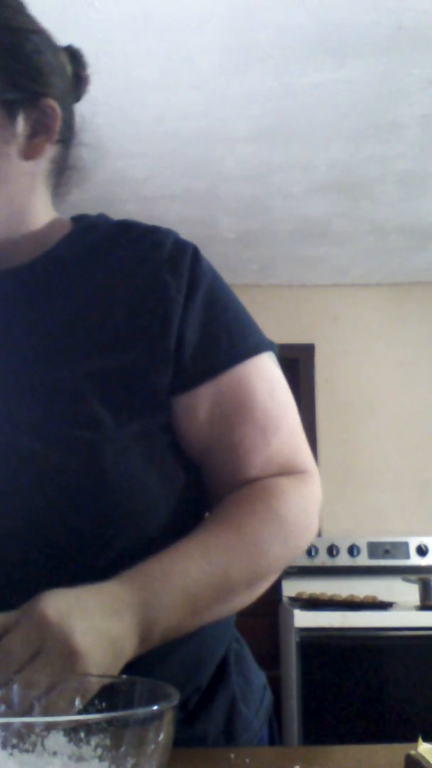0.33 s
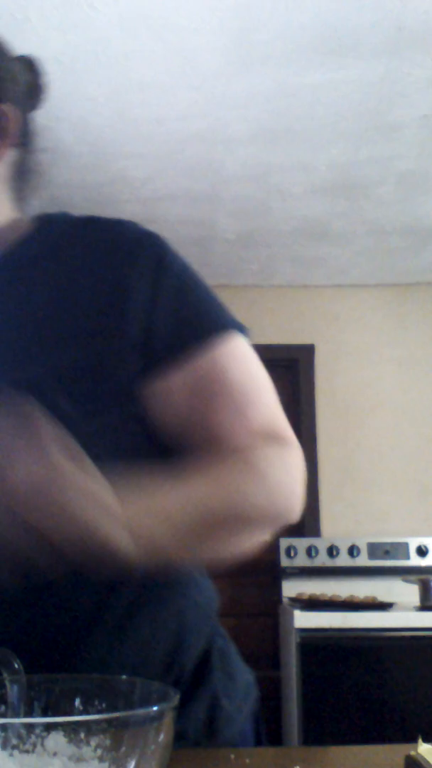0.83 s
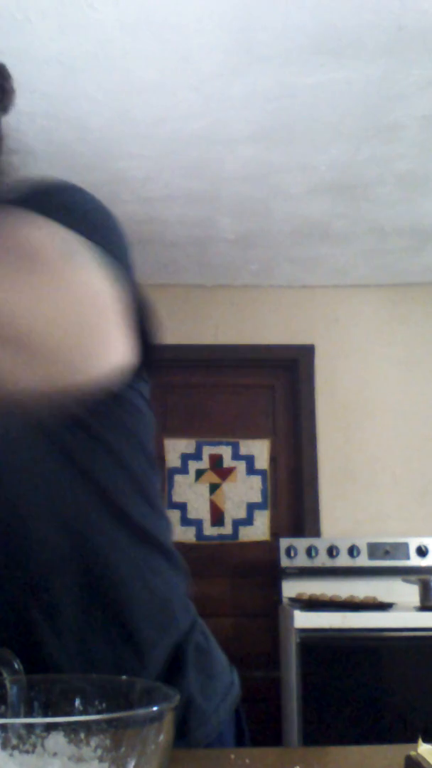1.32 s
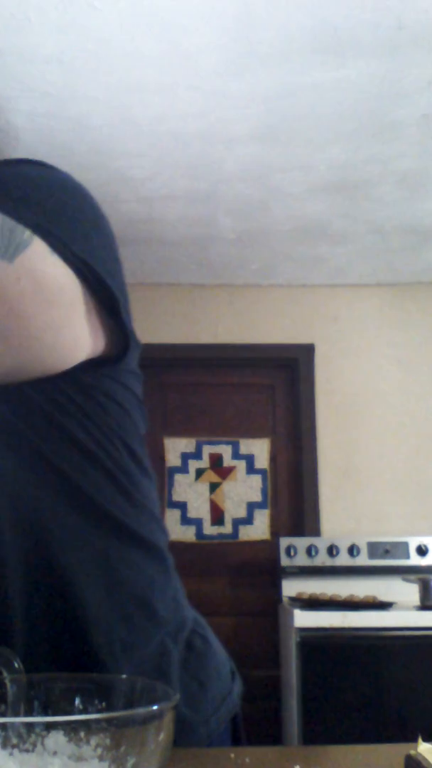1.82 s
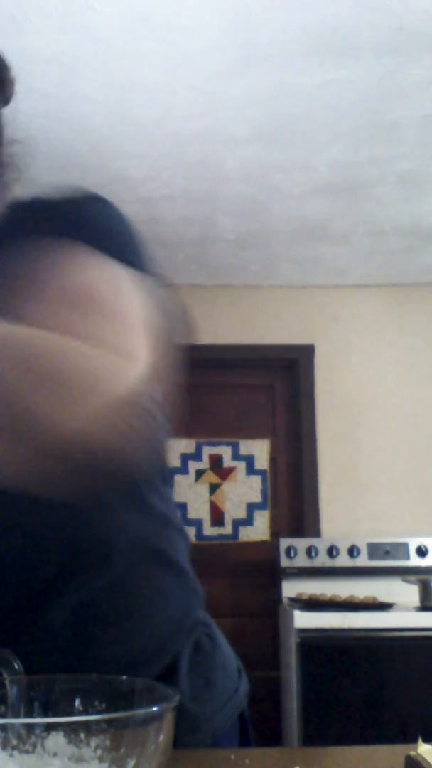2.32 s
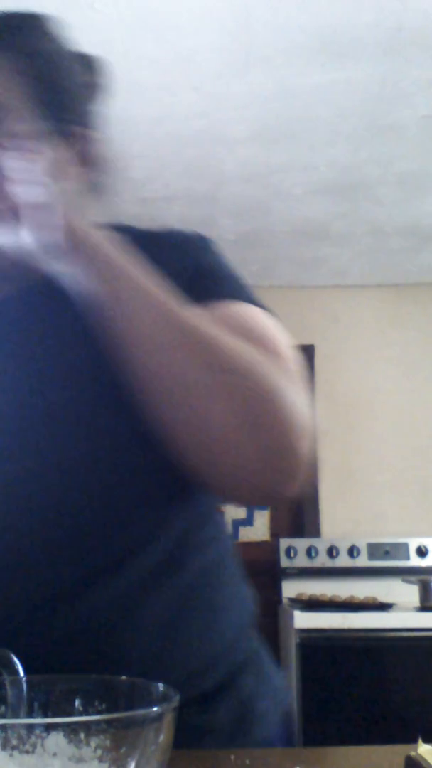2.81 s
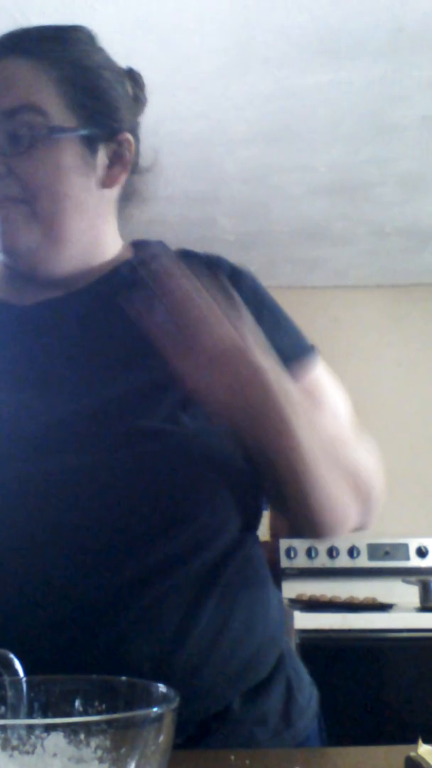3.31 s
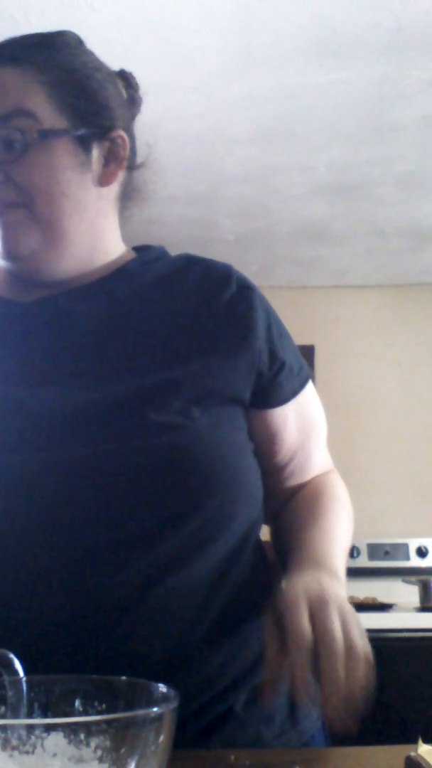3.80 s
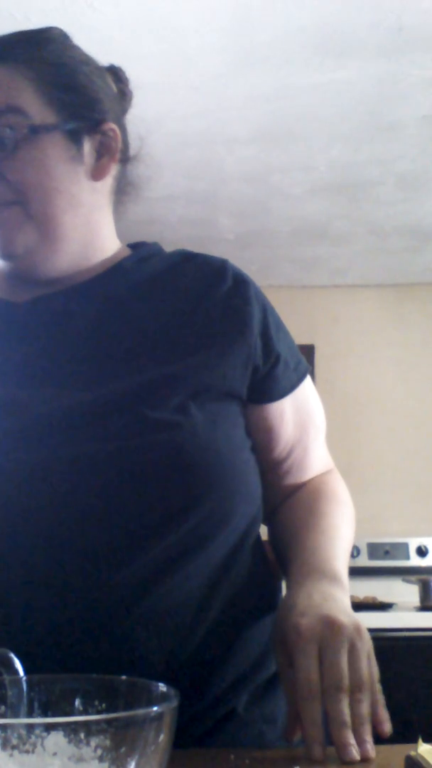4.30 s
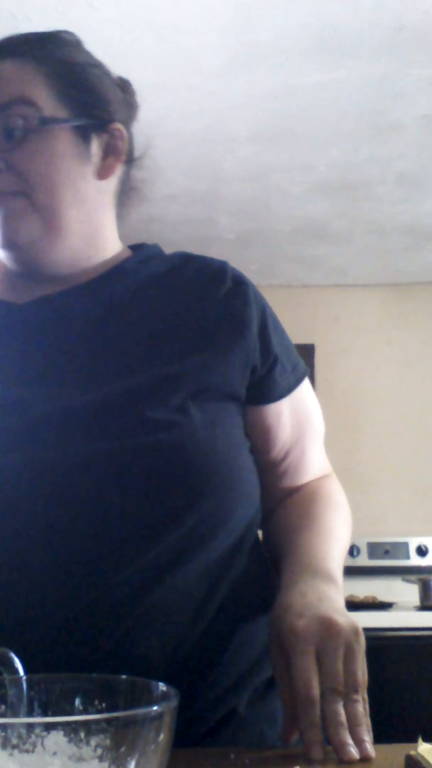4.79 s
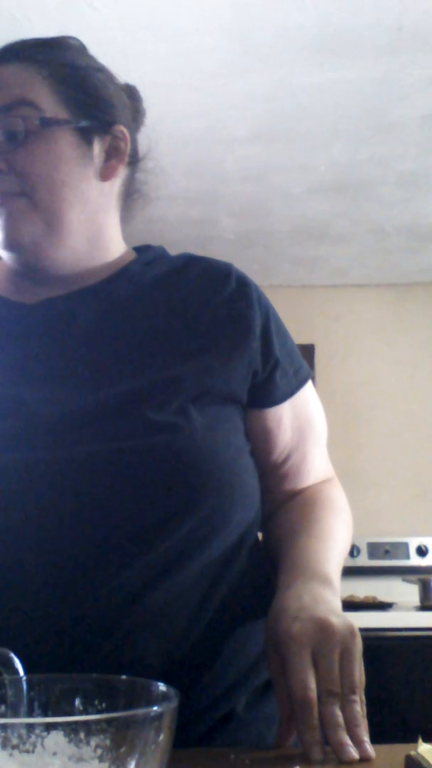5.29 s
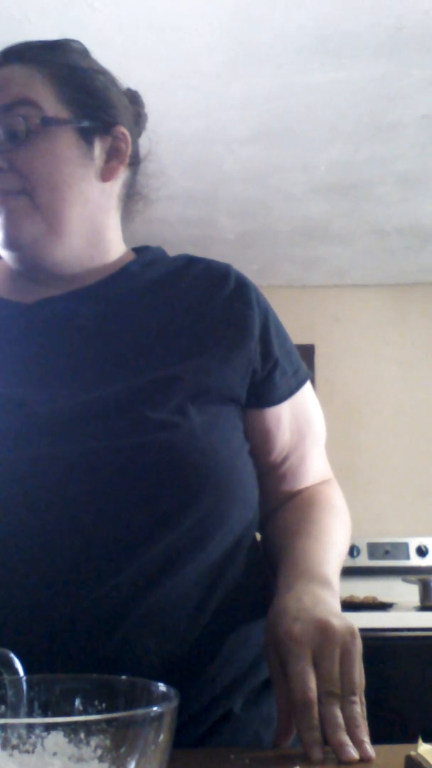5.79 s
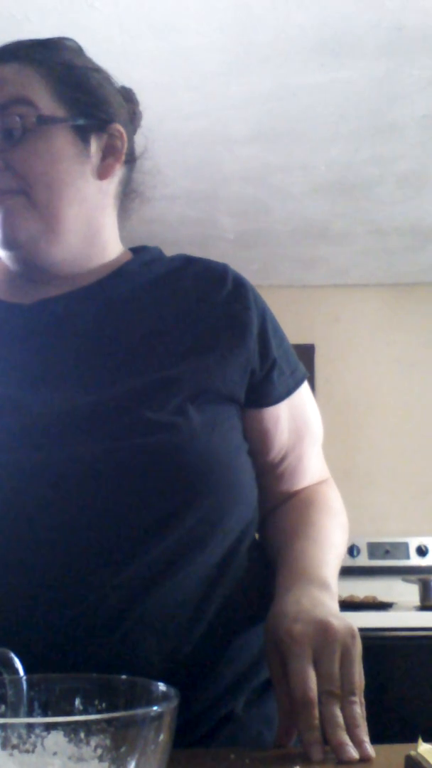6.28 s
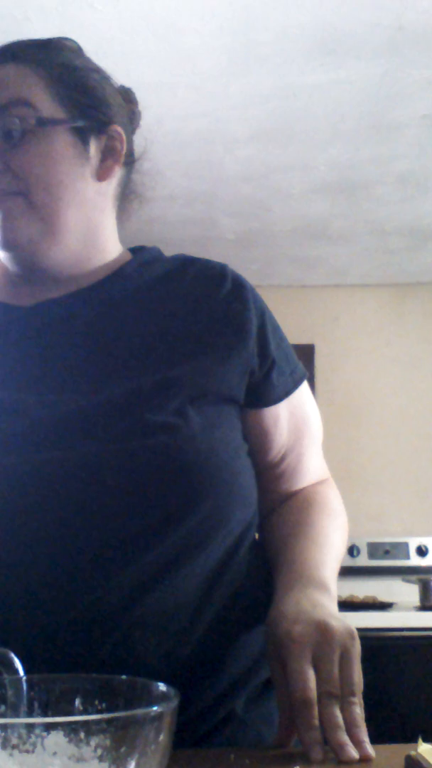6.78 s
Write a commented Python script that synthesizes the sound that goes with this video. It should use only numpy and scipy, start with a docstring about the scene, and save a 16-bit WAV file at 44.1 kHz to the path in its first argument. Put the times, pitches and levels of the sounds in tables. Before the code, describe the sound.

Thuds on a kitchen counter, faint taps and a glass clink, then a blender roars in two rattling pulses, grinding nuts.

```python
"""A kitchen blender runs in two pulses: nuts and crumbs strike the jar and ring its modes, housing and blade ring too,
and the motor hisses, rumbles and sings sliding tones. Each pulse follows a button and a relay click.
Before that come thuds on the counter and taps on jar, lid and a glass bowl, made of dying sines and noise bands.
A short room tail and a faint floor surround it all; a small microphone thins the bass and a limiter holds the peaks."""
import sys
import numpy as np
from scipy import signal
from scipy.fft import rfft, irfft, next_fast_len
from scipy.io import wavfile
from scipy.ndimage import uniform_filter1d, minimum_filter1d, map_coordinates

SR = 44100
rng = np.random.default_rng(int(sys.argv[2]) if len(sys.argv) > 2 else 0)


def inscribe(sig):
    """Save sig as 16-bit PCM at rate SR to the path in sys.argv[1].

    A 1-D sig is mono; a 2-D sig holds one channel per row.
    Samples are clipped to [-1, 1] before scaling.
    """
    pcm = np.round(np.clip(np.atleast_2d(sig).T, -1, 1) * 32767)
    wavfile.write(sys.argv[1], SR, pcm.astype(np.int16))


N = 310905
TIME = np.arange(N) / SR  # s

# Table levels are relative; t60 is the time to fall by 60 dB.
# thuds on the counter: (time [s], level [dB], pitch [Hz], added deep boom [dB], added knock [dB])
THUDS = [(0.001, -15, 273, -24, -1), (0.014, -14, 339, -6, -6.5), (0.029, -12.5, 292, -16, -13),
         (0.046, -17, 130, -15, -7.5), (0.157, -17, 270, -14, -21), (0.439, -57, 219, -7, -19.5),
         (0.598, -64.5, 218, -18.5, -16), (0.65, -58, 224, -25, -26.5), (1.032, -46, 208, -33, -35),
         (1.722, -63, 140, -3, -26), (1.752, -41.5, 142, -37, -40), (1.958, -29.5, 131, -26, -15),
         (1.984, -31.5, 72.7, -11.5, -13.5), (2.005, -32.5, 148, -7, -21)]
COUNTER_T60_S = 0.088
# damped bands of each tapped object: (frequency [Hz], width [Hz], level [dB], t60 before stretch [s], crack level [dB])
SEAT_BANDS = [(860, 400, 1, 0.16, -18.5), (1540, 660, -7, 0.31, -10), (3380, 1800, -12, 0.3, -7)]
RIM_BANDS = [(7250, 830, 0, 0.044, -11.5)]
LID_BANDS = [(2150, 710, 0, .075, -36)]
BOWL_BANDS = [(2180, 780, 2.5, 0.083, -25), (1225, 400, -14, .17, -20.5), (4000, 1500, -12.5, .12, -9),
              (6800, 1600, -17, 0.13, -20)]
BUTTON_BANDS = [(710, 420, 1, 0.057, -25), (1145, 200, -1, 0.13, -32.5), (1550, 240, -2, .13, -15),
                (3570, 600, -7, .06, -15.5)]
# taps on each object: (time [s], level [dB], stretch of the decay [factor])
SEAT_TAPS = [(.001, -39.5, 1.5), (1.955, -41, 1.02)]
RIM_TAPS = [(.176, -61, .6), (.187, -50, 1.3), (.222, -54, 1.1)]
LID_TAPS = [(1.021, -53.5, 1.1), (1.035, -52.5, 0.83)]
BOWL_TAPS = [(1.604, -46.5, 0.88)]
BUTTON_TAPS = [(3.374, -51.5, 0.83), (5.158, -38.5, 0.77)]
# colour of the nuts settling in the jar: (frequency [Hz], level [dB])
RUSTLE_COLOUR = [(1060, -31), (1800, 0), (1920, -6.5), (2980, -6.5), (3660, -2), (5410, -19), (7180, -2.5),
                 (8130, -17), (15000, -20.5)]
RUSTLE_DB, RUSTLE_FADE_DB_PER_S = -56.5, 35.5
RUSTLE_END_S, RUSTLE_CUT_DB_PER_S = 0.32, 129.5  # from here on the fade is steeper by this much
# colour of the steady floor: (frequency [Hz], level [dB])
ROOM_TONE_COLOUR = [(26, -9.5), (45, 2), (114, -9), (220, 5), (280, -10.5), (333, -5), (516, -13.5),
                    (597, -12.5), (973, -17.5), (1340, -16.5), (4870, -25.5), (7020, -21), (15300, -25.5)]
ROOM_TONE_DB = -73.5
# decay of the room's answer: (frequency [Hz], t60 [s])
ROOM_DECAY = [(100, .4), (1000, 0.42), (8000, 0.27)]
# clear ring of the glass bowl: (frequency [Hz], level [dB], t60 before stretch [s])
GLASS_MODES = [(1100, -4.5, 0.19), (1879, -8, 0.25), (2046, -7, 0.33), (2235, 5.5, 0.2), (2470, -15, 0.41),
               (3521, -18, 0.32), (4425, -22, 0.42)]
GLASS_DB = -15  # against the clack
# relay clicks: (time [s], level [dB])
RELAY_CLICKS = [(3.47, -51), (5.257, -40)]
# free ring of the relay armature: (frequency [Hz], t60 [s])
ARMATURE = (855, 0.056)

# each press of the motor: (start [s], power off [s], blades stop [s], rattle level [dB], rumble level [dB])
PULSES = [(3.5615, 4.69, 4.838, -11, -35), (5.347, 6.807, 7.2, -11, -37.5)]
SPIN_UP_S = 0.01  # time constant of the build-up
COAST_DB_PER_S, RING_OUT_DB_PER_S = 20.5, 238  # rattle fading after power off; everything dying after the stop
KICK_DB, KICK_S = 14.5, 0.18  # the base bucks at the start: extra rumble, time until half its dB are left
SHAKE_DB, HUM_DB = -54, -29  # running levels between the jolts
# treble while the blades turn, a list per pulse: (time [s], level [dB], blade ring over it [dB])
TREBLE_CURVES = [
    [(3.58, -40, 5), (3.608, -33.5, 3.5), (3.658, -36.5, 8), (3.776, -26.5, 10.5), (3.972, -32, 14),
     (4.35, -30, 9), (4.384, -27.5, 5.5), (4.67, -37.5, 10.5), (4.728, -37, 6), (4.86, -45, 6)],
    [(5.37, -35, 4.5), (5.388, -38.5, 14.5), (5.556, -25, 2.5), (5.644, -24.5, 6), (6.258, -32.5, 13.5),
     (6.676, -28, 9), (6.718, -33.5, 13), (6.802, -28, 9.5), (6.932, -39, 9), (7.04, -32, 9.5)],
]
# the load hangs clear of the blades, then drops back at once: (time of the drop [s], length before it [s], depth [dB])
LULLS = [(3.995, .045, 9.5), (4.2, 0.023, 6), (4.36, .05, 0), (4.52, 0.061, 5), (4.572, 0.04, 11),
         (4.678, 0.067, 9), (4.818, .06, 5), (5.87, 0.061, 4), (6.268, .15, 5), (6.415, .04, 1.5),
         (6.62, .025, 5), (6.721, 0.055, 7.5), (6.969, .09, 13), (7.006, .022, 16)]
LULL_IN_TREBLE = 0.36  # share of the depth
# the base rocks on the counter: (middle [s], length [s], added shake [dB], added rumble [dB], added housing hum [dB])
JOLTS = [(3.59, .1, 20, 2.5, 0.5), (3.654, 0.088, 5, 3, 19.5), (4.134, .14, 12, 13, 12),
         (4.25, .07, 19, 5, 1), (4.462, .14, 14, 1, 3), (4.724, 0.091, 20, 6, 6.5),
         (4.865, .06, 28.5, 12.5, 14), (5.422, 0.145, 17, 3, 14), (5.573, 0.11, -3, 2.5, 16),
         (5.802, 0.28, -11, -17, 12.5), (6.06, 0.089, 8, 3, 2), (6.414, 0.097, 3, 12, 6.5),
         (6.623, 0.074, 15, 12, -6), (6.862, 0.104, 23, 9.5, 4.5), (7.01, .07, 8, 4, 3)]
# large nuts thrown at the wall: (time [s], level [dB], crack over it [dB])
NUTS = [(3.603, -10.5, -4), (3.649, 0, -22), (3.738, -4.5, -10), (3.879, -6, -15.5), (3.997, -1, -7.5),
        (4.059, -3.5, -11), (4.104, -1, -15), (4.163, -2.5, -21), (4.218, 5.5, -20), (4.276, 1, -12),
        (4.529, 0, -16), (4.575, -13.5, -15), (4.678, -3, -14), (4.727, -7.5, -18.5), (4.809, -16.5, -20),
        (4.859, -21, -20), (5.649, 2.5, -7), (5.874, -0.5, -15), (5.924, 0.5, -15), (5.965, 2, -11),
        (6.039, -10.5, -1), (6.099, 0, -12), (6.147, 1.5, -20), (6.214, -4, -4), (6.251, -1.5, -17),
        (6.297, -9.5, -24), (6.419, -5, -24), (6.589, 1, -21), (6.725, -3.5, -18), (6.848, 10, -16.5),
        (6.975, 1, -24), (7.018, 3.5, -33)]
# resonances of the jar: (frequency [Hz], width [Hz], level [dB])
JAR_MODES = [(614, 54, -4), (679.3, 12, -0.5), (891, 51, -3), (1023.6, 46, -1.5), (1122, 17, 0.5),
             (1216, 54, 2.5), (1262, 69, 3), (1461, 80, -9), (1548, 110, -6), (1713, 25, -3), (1930, 37, 1),
             (1984, 70, -0.5), (2124, 32, -1), (3004, 56, -5), (3340, 140, -6.5), (3783, 70, -8),
             (4820, 53, -16)]
# resonances of the housing: (frequency [Hz], width [Hz], level [dB])
HOUSING_MODES = [(312.4, 21, 0)]
# resonances of the blade: (frequency [Hz], width [Hz], level [dB])
BLADE_MODES = [(2220, 13, -1.5), (2285, 22, -3.5)]
# broad response of the struck wall: (frequency [Hz], level [dB])
RATTLE_COLOUR = [(88, -53.5), (150, -16.5), (246, -29.5), (310, -4.5), (403, -2), (1190, 3), (1380, 0.5),
                 (2270, 4), (2530, 0), (6000, -25), (7800, -11), (13200, -120)]
# colour of the hiss: (frequency [Hz], level [dB])
HISS_COLOUR = [(3820, -7.5), (6500, -3), (8180, -1.5), (10100, -11), (12800, -17.5), (13400, -20),
               (15300, -24.5)]
# narrow bands in the hiss: (frequency [Hz], width [Hz], level [dB])
WHINE_BANDS = [(6690, 60, -2), (7540, 40, -2), (8160, 50, 1), (12370, 60, 5), (12765, 40, 8)]
WHINE_FADE_S = 0.5  # the narrow bands are strongest soon after each start
# colour of the splash: (frequency [Hz], level [dB])
SPLASH_COLOUR = [(2290, -22), (3900, -0.5), (4300, -8.5), (4860, -4.5), (5260, -20), (6500, -11.5),
                 (8450, -33.5), (14300, -120)]
SPLASH_DB = 2.5  # over the treble level
# colour of the motor rumble: (frequency [Hz], level [dB])
RUMBLE_COLOUR = [(56, -46), (95, -24.5), (113, -9.5), (248, -8.5), (280, -1.5), (360, -19.5), (620, -120)]
# colour of the low shake: (frequency [Hz], level [dB])
SHAKE_COLOUR = [(21, -38), (35, 0.5), (59, 8.5), (90, -18), (120, -30.5), (200, -120)]
# motor tones, most sagging as the load brakes the shaft: (start [s], length [s], from [Hz], to [Hz], level [dB])
MOTOR_TONES = [(3.6, .41, 370.3, 270.5, -20), (3.903, .17, 1076, 1087, -19), (5.36, .21, 125, 112, -27),
               (5.537, .39, 232.6, 171.7, -32), (5.862, .47, 362, 258.8, -16)]
SWELL = 1.13  # 0 = square, larger = more peaked
TOP_HZ = 15500  # band limit


def amp(db):
    """Decibels to a linear gain."""
    return 10 ** (np.asarray(db) / 20)


def unit(x):
    """Scales a sound to rms 1."""
    return x / np.sqrt(np.mean(x ** 2) + 1e-20)


def along(points, hz):
    """Reads (frequency, value) points on a log frequency axis."""
    f, v = np.transpose(points)
    return np.interp(np.log(hz + 1), np.log(f + 1), v)


def curves(*tables):
    """Draws each column after the time as a curve, per sample."""
    s, *cols = np.transpose(np.vstack(tables))
    return [np.interp(TIME, s, c) for c in cols]


def wobble(rate):
    """A smooth random curve, rate knots a second."""
    knots = rng.standard_normal(int(N * rate / SR) + 4)
    return map_coordinates(knots, [TIME * rate])


def arch(start, length):
    """Rises from 0 to 1 and falls back within length."""
    return np.sin(np.pi * np.clip((TIME - start) / length, 0, 1))


def filtered(x, response):
    """Shapes x by a complex response of frequency."""
    m = next_fast_len(N + SR // 2)
    return irfft(rfft(x, m) * response(np.fft.rfftfreq(m, 1 / SR)), m)[:N]


def noise(colour):
    """Coloured noise of rms 1."""
    return unit(filtered(rng.standard_normal(N), lambda hz: amp(along(colour, hz))))


def band(hz, width_hz):
    """One causal resonance."""
    return lambda f: 1j * f * width_hz / (hz * hz - f * f + 1j * f * width_hz)


def modes(table):
    """Several resonances side by side, with alternating sign."""
    return lambda f: sum((-1) ** k * amp(db) * band(hz, width_hz)(f) for k, (hz, width_hz, db) in enumerate(table))


def driven(force, response):
    """A force through a response whose mean power gain is brought to 1."""
    power = np.mean(np.abs(response(np.linspace(0, SR / 2, 20000))) ** 2)
    return filtered(force, response) / np.sqrt(power)


def burst(t60, length=SR // 2):
    """A decay of 60 dB in t60, and its time axis."""
    t = np.arange(length) / SR
    return amp(-60 * t / t60), t


def puff(hz, width_hz, t60):
    """A dying burst of noise in a band."""
    edges = np.clip([hz - width_hz / 2, hz + width_hz / 2], 50, SR / 2.2)
    sos = signal.butter(N=3, Wn=edges, btype="band", fs=SR, output="sos")
    return burst(t60)[0] * unit(signal.sosfilt(sos, rng.standard_normal(SR // 2)))


def add(track, s, sound):
    """Lays a sound on the track at s seconds."""
    part = track[round(s * SR):][:len(sound)]
    part += sound[:len(part)]


def room_tone():
    """A faint steady floor of coloured noise."""
    return amp(ROOM_TONE_DB) * noise(ROOM_TONE_COLOUR)


def rustle():
    """A faint grainy hiss of nuts settling in the jar, fading and then cut short."""
    after_end = np.maximum(TIME - RUSTLE_END_S, 0)
    db = RUSTLE_DB - RUSTLE_FADE_DB_PER_S * TIME - RUSTLE_CUT_DB_PER_S * after_end
    return amp(db + 1.8 * wobble(60)) * noise(RUSTLE_COLOUR)


def thuds():
    """The counter rings roughly at a low pitch, with a deep boom and a dull knock of noise."""
    rings, boom, knock = np.zeros((3, N))
    fall, t = burst(COUNTER_T60_S)
    boom_fall, _ = burst(2.9 * COUNTER_T60_S)
    for s, db, hz, boom_db, knock_db in THUDS:
        ring = fall * np.sin(2 * np.pi * hz * t)
        ring += amp(-11) * puff(hz, 1.2 * hz, 1.223 * COUNTER_T60_S)
        soft_onset = 1 - np.exp(-t / 0.0037)
        add(rings, s, amp(db + 6.0) * ring * soft_onset)
        add(boom, s, amp(db + boom_db) * boom_fall * rng.standard_normal(len(t)))
        add(knock, s, amp(db + knock_db) * fall * rng.standard_normal(len(t)))
    rings = filtered(rings, lambda f: 1 / (1 + 1j * f / 900) ** 2)
    boom = driven(boom, lambda f: band(78, 190)(f) ** 3)
    knock = driven(knock, lambda f: band(550, 730)(f) ** 3)
    return rings + boom + knock


def taps():
    """Each tap sounds the damped bands of its object, each with a brighter crack."""
    out = np.zeros(N)
    objects = ((SEAT_TAPS, SEAT_BANDS), (RIM_TAPS, RIM_BANDS), (LID_TAPS, LID_BANDS),
               (BOWL_TAPS, BOWL_BANDS), (BUTTON_TAPS, BUTTON_BANDS))
    for hits, body in objects:
        for s, db, stretch in hits:
            for hz, width_hz, band_db, t60, crack_db in body:
                clack = puff(hz, width_hz, stretch * t60)
                clack += amp(crack_db) * puff(4800, 4400, 0.72 * stretch * t60)
                add(out, s, amp(db + band_db) * clack)
    return out


def kitchen(x):
    """Each frequency of the room's answer, a dying noise, fades at its own speed."""
    hz, t, z = signal.stft(rng.standard_normal(SR // 2), SR, nperseg=256)
    t60 = along(ROOM_DECAY, hz)[:, None]
    tail = signal.istft(z * amp(-60 * t / t60), SR, nperseg=256)[1]
    delayed = np.pad(x, (200, 0))  # 200 samples
    return signal.fftconvolve(delayed, tail / np.linalg.norm(tail))[:N]


def clink():
    """The bowl also rings clearly for a moment, a dying sine for each mode."""
    out = np.zeros(N)
    for s, db, stretch in BOWL_TAPS:
        for hz, mode_db, t60 in GLASS_MODES:
            fall, t = burst(stretch * t60)
            add(out, s, amp(db + GLASS_DB + mode_db) * fall * np.sin(2 * np.pi * hz * t))
    return out


def relay():
    """The armature snaps, rings freely for a moment and is damped as it seats."""
    out = np.zeros(N)
    armature_hz, t60 = ARMATURE
    fall, t = burst(t60)
    seated = amp(-24 / (1 + np.exp(np.clip((0.018 - t) / 0.0015, -50, 50))))  # 24 dB down around 18 ms
    for s, db in RELAY_CLICKS:
        ring = fall * seated * np.sin(2 * np.pi * armature_hz * t) * (1 - np.exp(-t / 0.0016))
        add(out, s, amp(db + 8.5) * (ring + amp(-19) * puff(4000, 2200, 0.05)))
    return out


def running():
    """Gains of the layers as the motor spins up, coasts and stops: rattle, treble, rumble, shake, hum, blade ring."""
    on, rattle, rumble = np.zeros((3, N))
    for start, off, stop, rattle_db, rumble_db in PULSES:
        since = np.maximum(TIME - start, 0)
        spin_up = (1 - np.exp(-since / SPIN_UP_S)) ** 2
        turning = spin_up * amp(-RING_OUT_DB_PER_S * np.maximum(TIME - stop, 0))
        on += turning
        rattle += turning * amp(rattle_db - COAST_DB_PER_S * np.maximum(TIME - off, 0))
        rumble += turning * amp(rumble_db + KICK_DB / (1 + (since / KICK_S) ** 4))
    lull_db = np.zeros(N)
    for drop, length, depth_db in LULLS:
        lull_db -= depth_db * np.clip(1 + (TIME - drop) / length, 0, 1) * (TIME < drop)
    shake_db, rock_db, hum_db = sum(np.outer(dbs, arch(s - length / 2, length)) for s, length, *dbs in JOLTS)
    treble_db, ring_db = curves(*TREBLE_CURVES)
    treble = on * amp(treble_db + LULL_IN_TREBLE * lull_db)
    shake = on * amp(SHAKE_DB + shake_db)
    hum = on * amp(HUM_DB + hum_db)
    ring = on * amp(treble_db + ring_db)
    return rattle * amp(lull_db), treble, rumble * amp(rock_db), shake, hum, ring


def crumbs(surge):
    """Dense small impacts of uneven size, arriving in clumps."""
    sizes = amp(2.83 * rng.exponential(size=N)) * rng.standard_normal(N)
    impacts = unit(sizes * (rng.random(N) < 0.2))
    return impacts * amp(0.67 * surge + 3.2 * wobble(30) + 2.3 * wobble(90))


def chunks(count):
    """Half-ground pieces hit at random moments, each a short rough clack of its own pitch; rms 1."""
    out, t = np.zeros(N), np.arange(SR // 20) / SR
    for when, pitch, size, life in rng.random((count, 4)):
        hz = 600 * 9 ** pitch
        rough_hz = hz * (1 + 0.38 * rng.standard_normal(len(t)))
        tone = np.sin(2 * np.pi * np.cumsum(rough_hz) / SR)
        t60 = 0.0099 + 0.018 * life
        add(out, when * N / SR, amp(9 * size - 60 * t / t60) * tone)
    return unit(filtered(out, lambda f: amp(0.5 * along(RATTLE_COLOUR, f))))


def rattle_and_ring(surge, level, hum, ring):
    """Crumbs strike in surges and nuts singly, setting off the wall and modes of jar, housing and blade."""
    blows, cracks = np.zeros((2, N))
    for s, db, crack_db in NUTS:
        add(blows, s, amp(db - 6) * burst(0.044)[0] * rng.standard_normal(SR // 2))
        add(cracks, s, amp(db + crack_db - 0.5) * puff(3600, 2100, 0.045))
    wall = lambda f: amp(along(RATTLE_COLOUR, f))
    out = cracks + level * amp(-8.5) * chunks(count=900)
    out += amp(-7) * driven(level * crumbs(surge) + blows, wall)
    for k in range(4):  # the crumbs land at changing spots, so the modes flare up in turn
        force = level * amp(3.0 * wobble(8)) * crumbs(surge) + blows
        out += amp(-10.5) * driven(force, modes(JAR_MODES[k::4]))
    out += driven(hum * amp(1.7 * wobble(10)) * crumbs(surge), modes(HOUSING_MODES))
    out += driven(ring * amp(1.1 * wobble(10)) * crumbs(surge), modes(BLADE_MODES))
    # a small plastic jar radiates neither bass nor high treble
    return filtered(out, lambda f: (1j * f / (150 + 1j * f)) ** 2 / (1 + (f / 7500) ** 4))


def hiss_and_splash(surge, treble):
    """Droplets and dust in the air stream: coloured noise with narrow bands, and a splash that follows it."""
    air = lambda f: amp(along(HISS_COLOUR, f))
    whine = lambda f: air(f) * np.abs(modes(WHINE_BANDS)(f))
    fresh = 0.3 + sum((TIME > start) / (1 + ((TIME - start) / WHINE_FADE_S) ** 2) for start, *_ in PULSES)
    spray = crumbs(surge) + amp(1.3 * surge + 1.5) * rng.standard_normal(N)
    hiss = unit(filtered(spray, air) + fresh * filtered(spray, whine))
    splash = unit(filtered(spray, lambda f: amp(along(SPLASH_COLOUR, f))))
    hiss += splash * amp(SPLASH_DB + 2.5 * wobble(12))
    return treble * amp(1.3 * wobble(14)) * hiss


def blender():
    """The load tumbles over the blades in surges shared by rattle and hiss, over an unsteady rumble and shake."""
    level, treble, rumble, shake, hum, ring = running()
    surge = wobble(22)
    bass = rumble * noise(RUMBLE_COLOUR) * amp(3.2 * wobble(12))
    bass += shake * noise(SHAKE_COLOUR) * amp(3.6 * wobble(12))
    return rattle_and_ring(surge, level, hum, ring) + hiss_and_splash(surge, treble) + bass


def motor_tones():
    """Slightly unsteady sines that swell and fade while they slide."""
    out = np.zeros(N)
    for start, length, from_hz, to_hz, db in MOTOR_TONES:
        hz = np.interp(TIME, [start, start + length], [from_hz, to_hz])
        phase = 2 * np.pi * np.cumsum(hz + 3 * wobble(30)) / SR
        swell = np.abs(arch(start, length)) ** SWELL * (TIME < start + length)
        out += swell * np.sqrt(2) * amp(db + 0.76 * wobble(14)) * np.sin(phase)
    return out


def scene():
    """Handling sounds and the blender in the room, over a faint steady floor."""
    hands = thuds() + taps() + clink()
    machine = blender() + motor_tones() + relay()
    room = kitchen(amp(-11) * hands + amp(-18.5) * machine)
    return (hands + machine + rustle() + room + room_tone())[None]


def record(dry):
    """The microphone drops the deep bass, a limiter holds the peaks; nothing passes above the band limit."""
    sound = filtered(dry[0], lambda hz: (1j * hz / (35 + 1j * hz)) ** 2)
    need = np.minimum(1, 0.96 / (np.abs(sound) + 1e-9))
    gain = uniform_filter1d(minimum_filter1d(need, size=500), size=250)
    return filtered(sound * gain, lambda hz: hz < TOP_HZ)[None]


dry = scene()
out = record(dry)
inscribe(out)
```